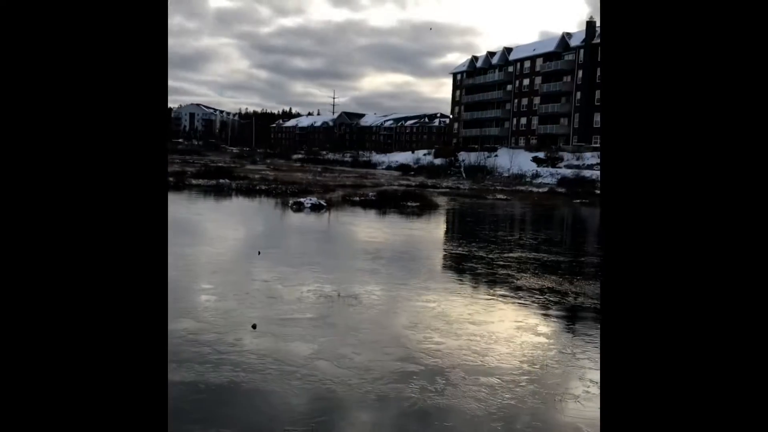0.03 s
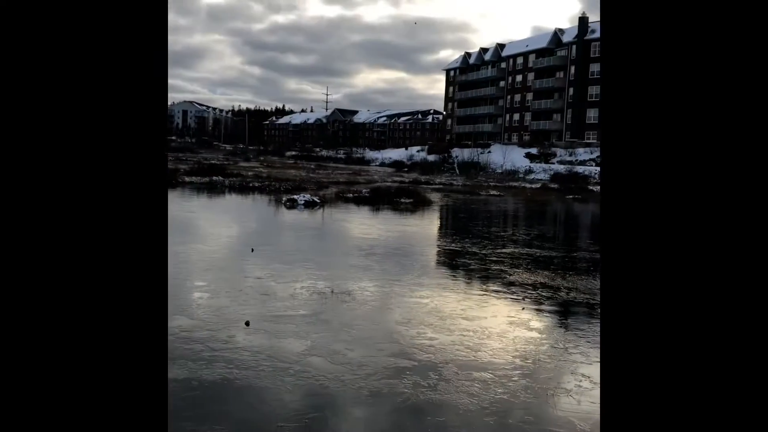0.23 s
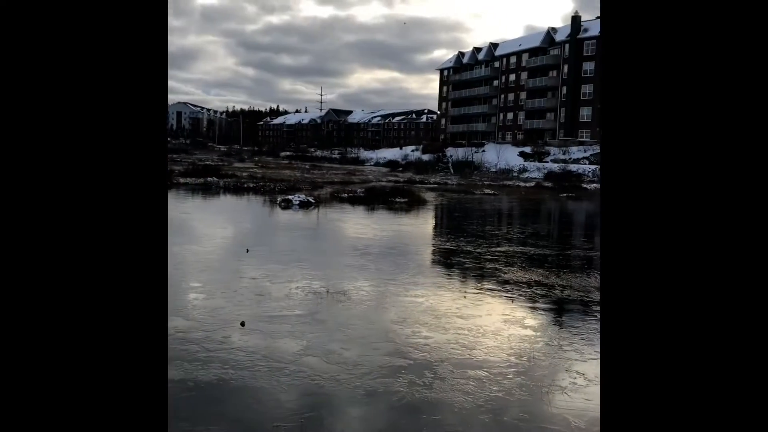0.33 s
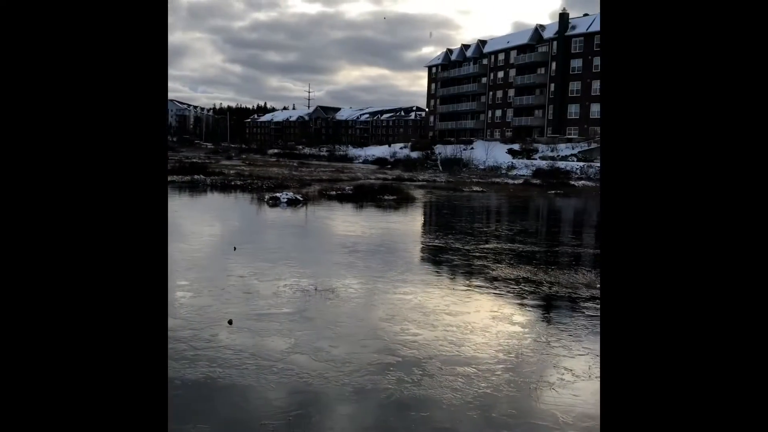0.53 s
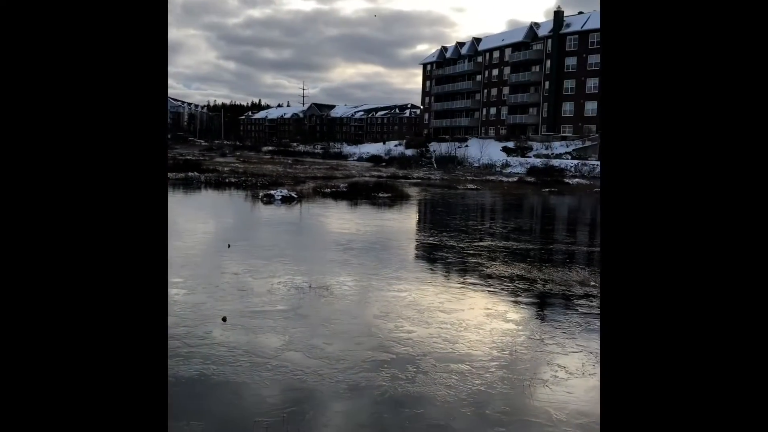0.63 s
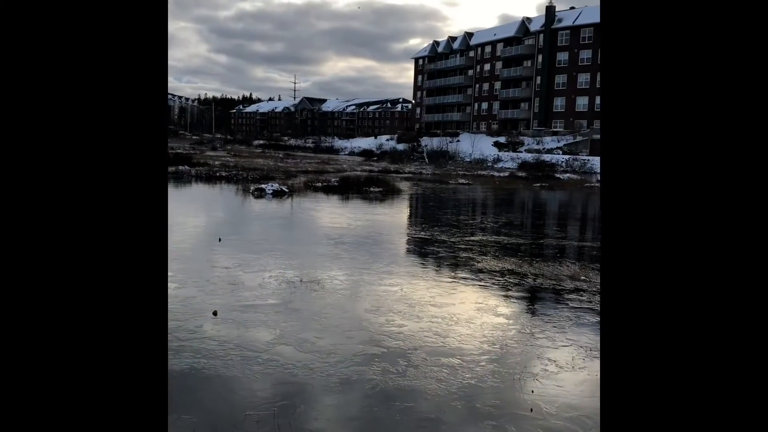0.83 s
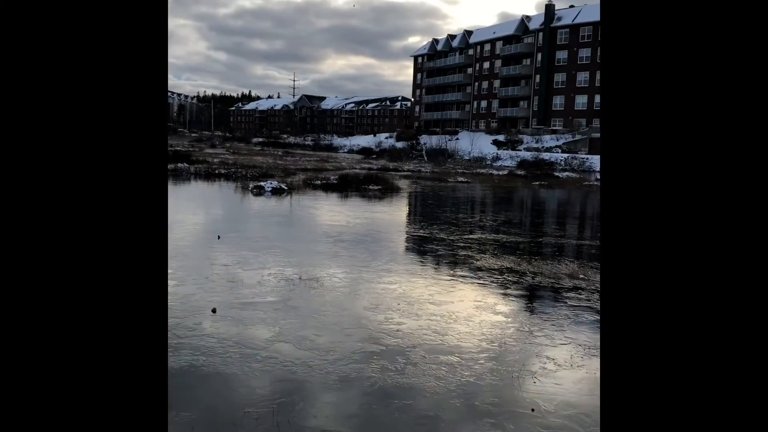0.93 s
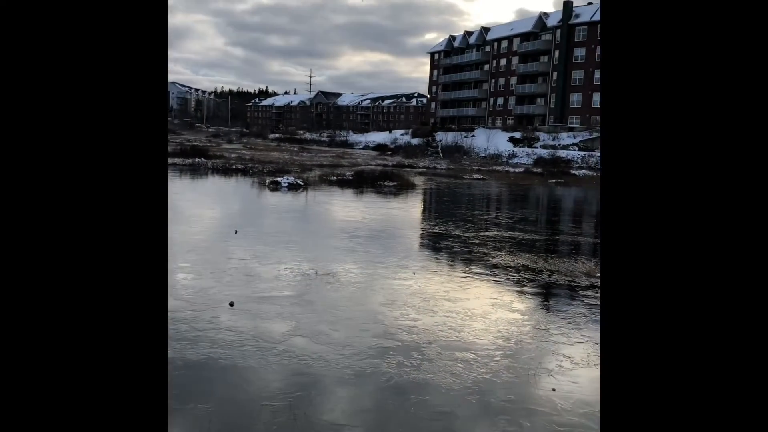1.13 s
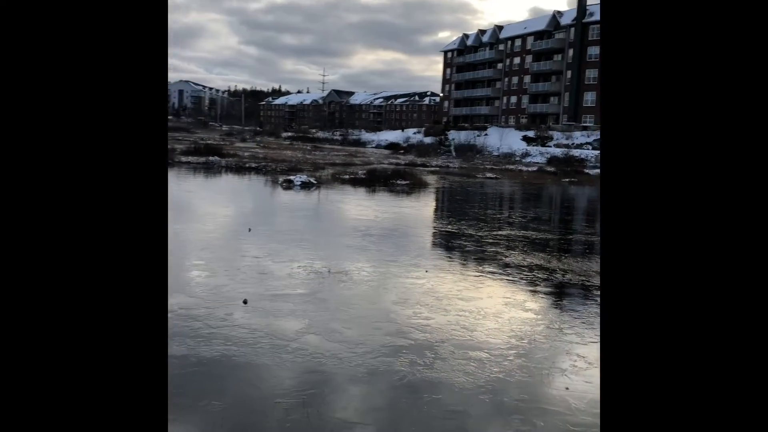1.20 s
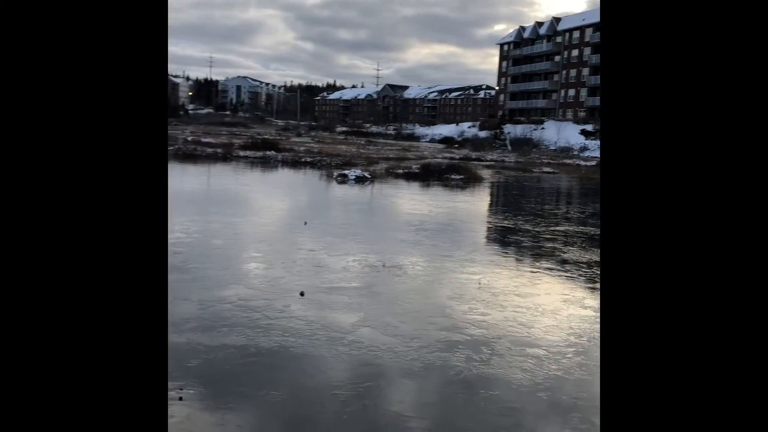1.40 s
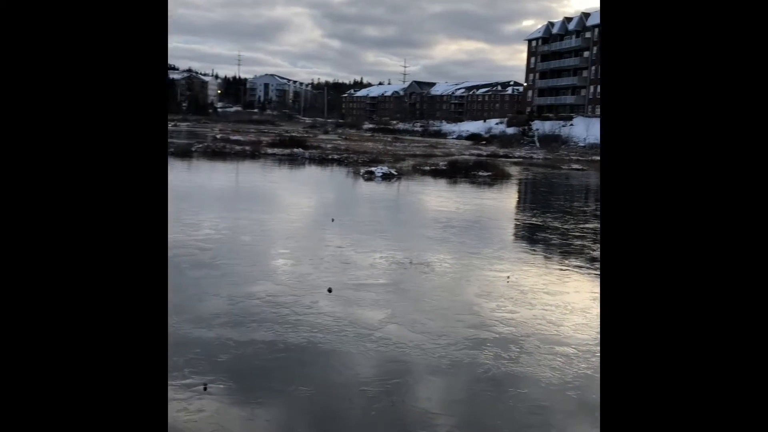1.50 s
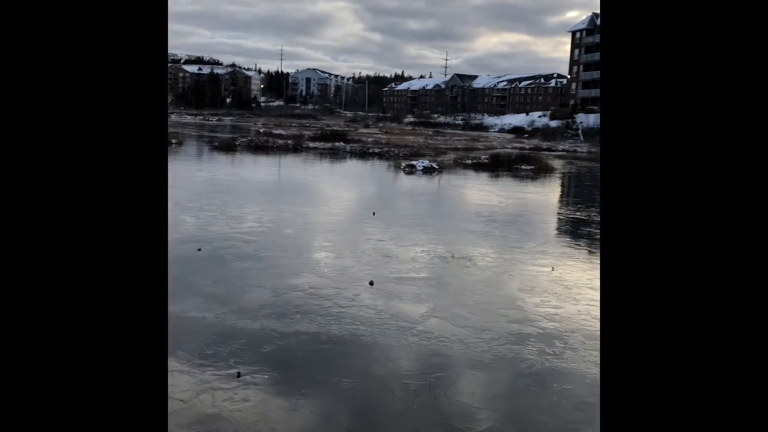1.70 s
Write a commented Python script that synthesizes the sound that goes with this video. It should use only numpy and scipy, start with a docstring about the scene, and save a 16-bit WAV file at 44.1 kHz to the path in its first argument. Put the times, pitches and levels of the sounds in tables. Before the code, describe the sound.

Pebbles bounce on a frozen lake several metres away, each hit a quick falling chirp with a brief ring and click. Strong hits land at about 0.2, 0.35 and 0.6 seconds, the loudest at 0.8 and 0.9. Lighter bounces and skittering grit follow, lifting slightly near 1.4 and fading by 1.7 seconds. A dull echo trails the hits, over faint wind rumble and a distant town hush.

```python
"""A frozen lake, microphone on the shore 1.43 m above the ice; wind rumbles on it over a distant hush.
From 0.2 s thrown pebbles bounce on the thin ice, 4 to 12 m away. Each touch sends a bending wave through
the sheet: its treble runs ahead, so it arrives as a falling chirp, settles on the note at which the wave
keeps pace with sound in air, and ends with the contact click that came through the air.
The shore returns a dull smear, grit skitters in between, and the bounces grow fainter."""
import sys
import numpy as np
from scipy import signal
from scipy.fft import rfft, irfft
from scipy.io import wavfile

SR = 44100
rng = np.random.default_rng(int(sys.argv[2]) if len(sys.argv) > 2 else 0)


def store_pcm(level_fs):
    """Save levels as 16-bit WAV."""
    pcm = np.round(np.clip(level_fs, -1, 1) * 32767).astype(np.int16)
    wavfile.write(sys.argv[1], SR, np.atleast_2d(pcm).T)


N = 77175
SPAN, LEAD = 16384, 1024  # samples in one touch, and those ahead of its front
HZ = np.maximum(np.arange(SPAN // 2 + 1) * SR / SPAN, 1e-3)
SOUND_M_PER_S, MIC_HEIGHT_M = 343, 1.43
ICE_NOTE_HZ = 1848  # where the bending wave is as fast as sound in air


def from_db(db):
    """Decibels to gain."""
    return 10 ** (np.asarray(db) / 20)


def colour(points, hz):
    """Gain of a spectrum table at the given frequencies."""
    at_hz, db = np.transpose(points)
    return from_db(np.interp(np.log(hz + 1e-9), np.log(at_hz), db))


def envelope(points):
    """Gain of a level table at every sample."""
    return from_db(np.interp(np.arange(N) / SR, *np.transpose(points)))


def noise(points):
    """Steady noise with the given spectrum, rms 1."""
    hz = np.arange(N // 2 + 1) * SR / N
    x = irfft(rfft(rng.standard_normal(N)) * colour(points, hz), N)
    return x / x.std()


def burst(decay_s):
    """Spectrum of a dying puff of noise with unit energy."""
    x = rng.standard_normal(SPAN) * np.exp(-np.arange(SPAN) / SR / decay_s)
    return rfft(x / np.sqrt(np.sum(x ** 2)))


def add(out, arrival_s, sound):
    """Mix a touch in so that its front falls at arrival_s."""
    start = int(arrival_s * SR) - LEAD
    part = sound[max(-start, 0):max(N - start, 0)]
    out[max(start, 0):max(start, 0) + len(part)] += part


def wind():
    """Gusts rumble on the microphone."""
    # strength of the gusts: time_s, level_db
    gusts = [(0.0, -45.5), (0.102, -38), (0.418, -36.5), (0.466, -53), (0.72, -39.5), (0.744, -56),
             (0.856, -44.5), (0.882, -27), (0.964, -39.5), (1.056, -31.5), (1.126, -39.5), (1.204, -31.5),
             (1.316, -54.5), (1.466, -38.5), (1.516, -53), (1.75, -47.5)]
    # spectrum of the rumble: frequency_hz, level_db
    rumble = [(12, -60), (25, -43), (40, -21), (60, -5), (100, 1), (150, 3), (210, -4.5), (300, -12),
              (600, -27.5), (2000, -67.5)]
    return envelope(gusts) * noise(rumble)


def town_hush(level_db=-43):
    """The steady hush of a town in the distance."""
    # spectrum of the hush: frequency_hz, level_db
    spectrum = [(30, -4), (100, -15.5), (250, 1.5), (420, -3.5), (700, 2.5), (950, 6), (1400, -1.5),
                (1900, -7.5), (2600, -21), (4500, -33.5), (7000, -64), (16000, -72)]
    return from_db(level_db) * noise(spectrum)


def hiss():
    """A faint high hiss, strongest in the first 0.3 s."""
    # strength of the hiss: time_s, level_db
    levels = [(0, -56.5), (.05, -71), (.16, -63), (.26, -64.5), (.31, -73), (1.75, -77)]
    # spectrum of the hiss: frequency_hz, level_db
    spectrum = [(1500, 2), (3000, 1.5), (5500, 4), (8500, -1.5), (11000, -3.5), (16000, -1)]
    return envelope(levels) * noise(spectrum)


def chirp(ice_lag, edge_hz, uneven_share=.42):
    """Spectrum of the bending wave; uneven ice splits it into close paths that colour each touch."""
    # spectrum of the direct wave: frequency_hz, level_db
    spectrum = [(60, -52), (200, -22.5), (400, -16.5), (800, -1.5), (1300, -1), (2200, 3.5), (3000, 0.5),
                (4300, -2), (7000, -5), (16000, -10.5)]
    paths = np.sqrt(1 - uneven_share ** 2) + uneven_share * burst(decay_s=.0014)
    return -1j * colour(spectrum, HZ) * paths * np.exp(-1j * ice_lag) / (1 + (HZ / edge_hz) ** 10)


def scattered_waves(ice_lag, edge_hz, tail):
    """Spectrum of the waves that scatter in the sheet and trail the chirp."""
    # spectrum of the scattered waves: frequency_hz, level_db
    spectrum = [(40, -53), (150, -21), (400, -9.5), (680, 3.5), (1000, -0.5), (1500, 0.5), (1900, 4.5),
                (2600, -9.5), (4000, -13.5), (7000, -23.5), (16000, -40)]
    return colour(spectrum, HZ) * tail * np.exp(-1j * ice_lag) / np.hypot(1, (HZ / edge_hz) ** 2)


def ice_note(ice_lag, along_s, up_s, width_hz=1340):
    """Spectrum of the note: sound shed all along the path adds up in step until the click arrives."""
    end_lag = 2 * np.pi * (along_s * HZ + up_s * ICE_NOTE_HZ)
    in_step = np.sinc((end_lag - ice_lag) / (2 * np.pi)) * np.exp(-.5j * (ice_lag + end_lag))
    near_note = np.exp(-.5 * ((HZ - ICE_NOTE_HZ) / width_hz) ** 2)
    return in_step * near_note


def click(air_lag, click_db, tail):
    """Spectrum of the contact heard straight through the air; softer contacts are duller."""
    # spectrum of stone striking ice: frequency_hz, level_db
    spectrum = [(300, -15), (2000, -10), (4500, -1), (6000, -1), (7800, 8.5), (9500, 0.5), (13000, 5),
                (16000, -7)]
    contact = burst(decay_s=.0004) + from_db(-15) * tail
    edge_hz = 24000 * 2 ** (click_db / 30)  # an octave lower for every 30 dB softer
    gain = from_db(click_db) * colour(spectrum, HZ) / (1 + (HZ / edge_hz) ** 4)
    return gain * contact * np.exp(-1j * air_lag)


def touch(distance_m, chirp_db, bass_db_per_octave, edge_hz, click_db, ring_db=0):
    """One contact as it reaches the microphone: chirp, scattered waves, the ice's note and the click."""
    along_s, up_s = distance_m / SOUND_M_PER_S, MIC_HEIGHT_M / SOUND_M_PER_S
    # phase lags: straight through the air; along the ice and then up to the microphone
    air_lag = 2 * np.pi * np.hypot(along_s, up_s) * HZ
    ice_lag = 2 * np.pi * (along_s * np.sqrt(ICE_NOTE_HZ * HZ) + up_s * HZ)
    direct = chirp(ice_lag, edge_hz)
    tail = burst(decay_s=.11 / np.log(1000))  # falls 60 dB in 0.11 s
    scattered = scattered_waves(ice_lag, edge_hz, tail)
    note_gain = from_db(12.5 + ring_db) * distance_m / 8.3  # the note grows with the path
    note = note_gain * ice_note(ice_lag, along_s, up_s)
    # each touch has its own bass tilt, fuller or thinner, over 1.66 octaves below 1560 Hz
    octaves_below = np.clip(np.log2(1 + (1560 / HZ) ** 2) / 2, 0, 1.66)
    ice_gain = from_db(chirp_db + bass_db_per_octave * octaves_below)
    at_mic = ice_gain * (direct + scattered + note) + click(air_lag, click_db, tail)
    front_s = along_s / 2 * np.sqrt(ICE_NOTE_HZ / 6000) + up_s  # travel time of the 6 kHz front
    return irfft(at_mic * np.exp(-2j * np.pi * HZ * (LEAD / SR - front_s)))


def pebbles():
    """Thrown pebbles strike the ice in clear, separate bounces."""
    # the bounces: arrival_s, distance_m, chirp_db, bass_db_per_octave, edge_hz, click_db, ring_db
    bounces = [ (.2040, 9.2, 14, 2.5, 5530, -17.5, -6.5), (.2085, 7.66, 1, 9, 5500, -27, 2),
               (0.3522, 9.7, 16, 3.5, 4540, -8.5, -2), (0.388, 9.8, -7, 4, 5540, -11.5, 3),
               (0.398, 10, -6, 6, 5500, -18.5, 12), (0.469, 9.2, -16, 14.5, 5500, -53, 5),
               (.4838, 10.6, 4, -4.5, 5340, -37.5, 1.5), (0.541, 11.3, -11.5, 3, 5590, -38, -4),
               (0.603, 9.6, 6.5, -9.5, 4300, -15.5, 1), (0.606, 8.5, 12, -10, 4450, -18, 1.5),
               (0.6431, 11.2, 6.5, -5, 4630, -29.5, 1), (.6910, 10.4, -11, 4, 4240, -37.5, 2.5),
               (0.7303, 12, -4.5, -0.5, 4400, -44, 0.5), (0.803, 4, -1, -16, 5540, -10, 0),
               (0.8054, 5.07, 16.5, -9, 6480, 2, -2), (.9080, 8.2, 22, -6, 5280, -6, 4.5),
               (.9245, 4.58, 11.5, -2.5, 4960, -7.5, -0.5), (1.0102, 10.2, -11, 2.5, 4440, -55, 6),
               (1.0295, 9.6, -11.5, 5, 5000, -50, 7.5), (1.083, 12.4, -8.5, -10, 3934, -48, 5),
               (1.0962, 5.2, -3, -8.5, 5230, -30.5, 10), (1.1009, 12, -3, -1.5, 4200, -36, 6),
               (1.1418, 11.7, -6.5, -6, 4400, -31.5, 1), (1.171, 6.2, -8, -5, 5600, -34, -5),
               (1.2310, 9.8, -19.5, -3, 4330, -52, 7), (1.2813, 7.2, -5.5, -7, 4580, -48, -4),
               (1.2983, 5.0, -3, -6, 4600, -42, -26), (1.325, 6.2, -13, 4, 4460, -46, 2),
               (1.342, 6.9, -15, -9, 4900, -49, 5), (1.355, 6.6, -10, -12, 5000, -43, 0),
               (1.3666, 5.4, 0.5, 1, 5000, -24.5, -3), (1.3698, 4.7, -4, -3.5, 5500, -37, 8),
               (1.4423, 10.1, 1, 1.5, 5300, -24, 8), (1.4464, 10.3, 0.5, -4, 5300, -30.5, -1),
               (1.4998, 5.5, -5, -1, 5200, -30, 5), (1.5866, 9.6, -5, 2, 4480, -58, 2),
               (1.6410, 7.0, -26.5, -3, 4750, -52, -6), (1.6877, 5.4, -13.5, -3, 5000, -54, -2),
               (1.7010, 9.3, -14, -6, 4800, -53, 5.5), (1.731, 5.7, -20, -7, 5000, -50, -0.5)]
    out = np.zeros(N)
    for arrival_s, *contact in bounces:
        add(out, arrival_s, touch(*contact))
    return out


def shore_return(ice, delay_s=.041, gain_db=-16):
    """The waves come back dull and smeared from the edge of the ice."""
    # colour of the return: frequency_hz, gain_db
    spectrum = [(200, -25), (700, 2), (1400, 4.5), (2000, -2), (2800, -12.5), (6000, -20.5)]
    response = irfft(colour(spectrum, HZ) * burst(decay_s=.045) * np.exp(-2j * np.pi * HZ * delay_s))
    return from_db(gain_db) * signal.fftconvolve(ice, response)[:N]


def skitter(start_s=.45, hops_per_s=40):
    """Grit makes small, irregular hops 6 to 11 m from the microphone."""
    out = np.zeros(N)
    for slot_s in np.arange(start_s, N / SR, 1 / hops_per_s):
        chirp_db = rng.normal(-21, 4.5)
        distance_m = rng.uniform(6, 11)
        arrival_s = slot_s + rng.uniform(-.83, 1) / hops_per_s
        hop = touch(distance_m, chirp_db, bass_db_per_octave=0, edge_hz=4370, click_db=chirp_db - 28)
        add(out, arrival_s, hop)
    return out


def scene():
    """Everything at one microphone on the shore."""
    ice = pebbles() + skitter()
    return (wind() + town_hush() + hiss() + ice + shore_return(ice))[None]


def record(dry, cutoff_hz=16300):
    """A steep low-pass cuts the top of the treble."""
    return signal.sosfilt(signal.ellip(10, .2, 80, cutoff_hz, fs=SR, output="sos"), dry)


dry = scene()
out = record(dry)
store_pcm(out)
```